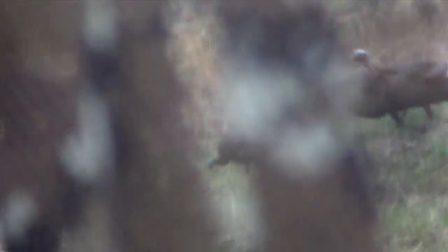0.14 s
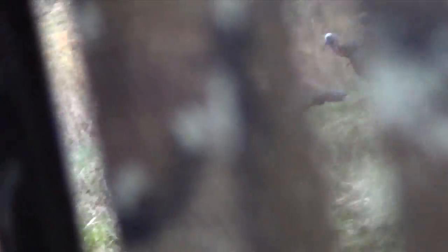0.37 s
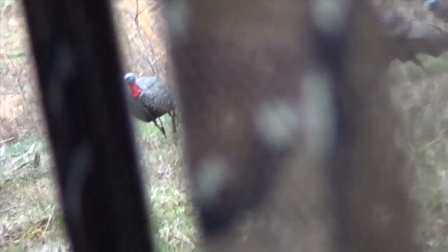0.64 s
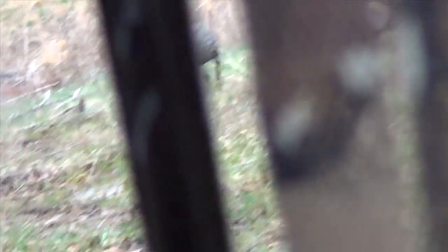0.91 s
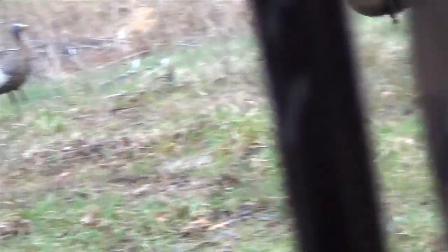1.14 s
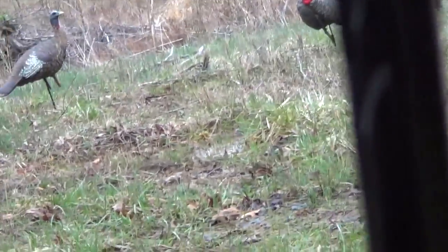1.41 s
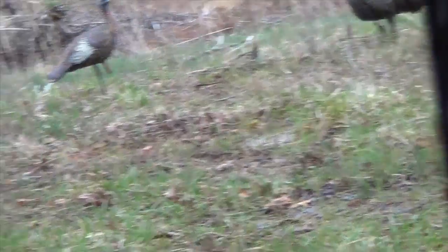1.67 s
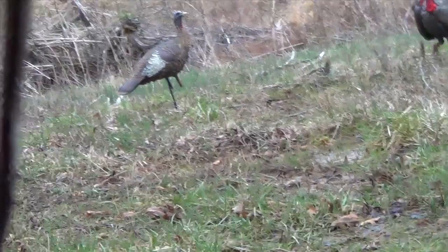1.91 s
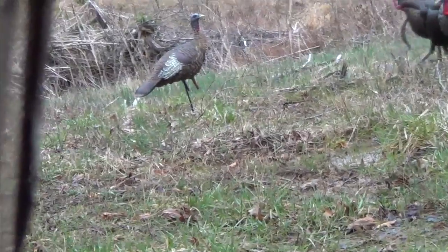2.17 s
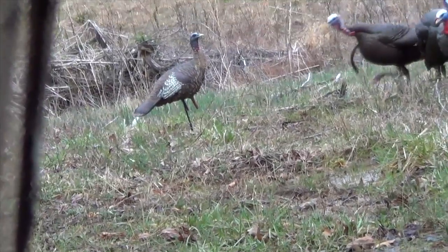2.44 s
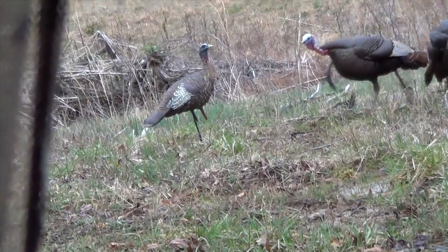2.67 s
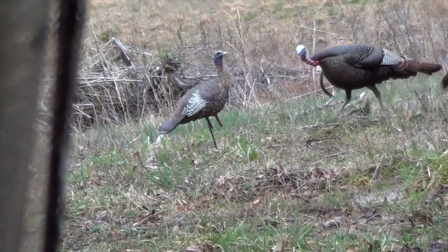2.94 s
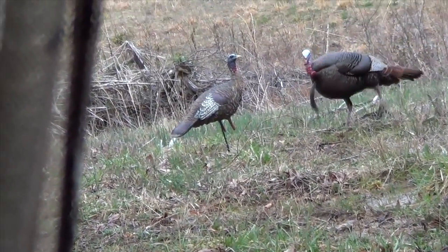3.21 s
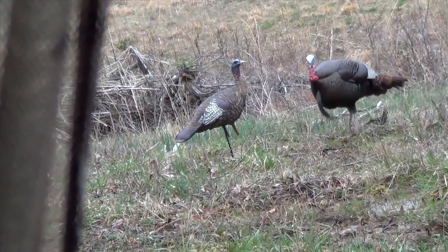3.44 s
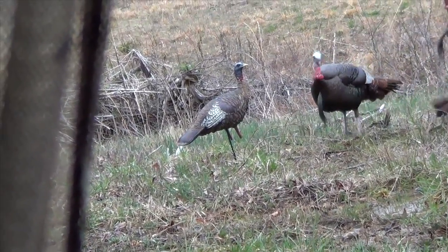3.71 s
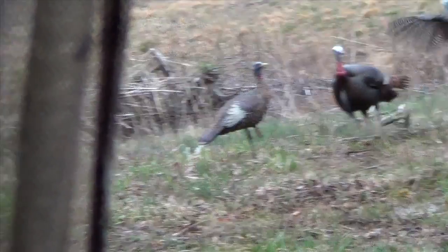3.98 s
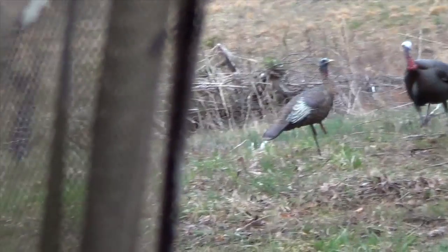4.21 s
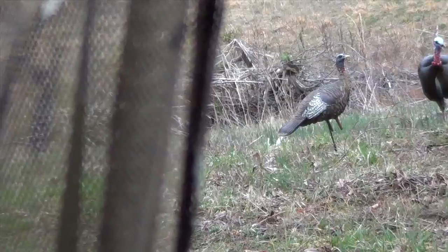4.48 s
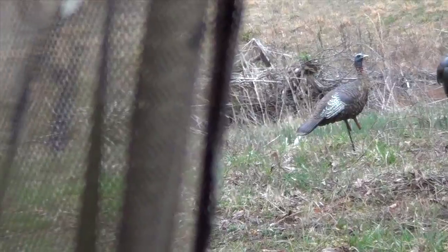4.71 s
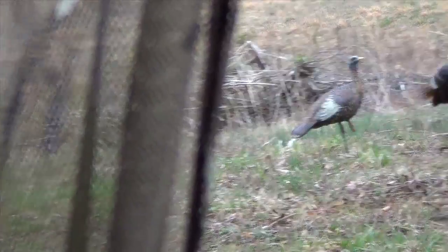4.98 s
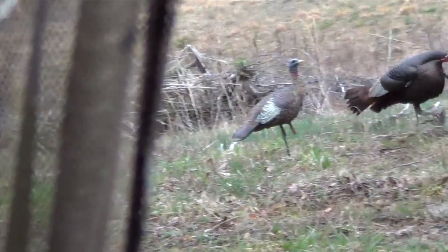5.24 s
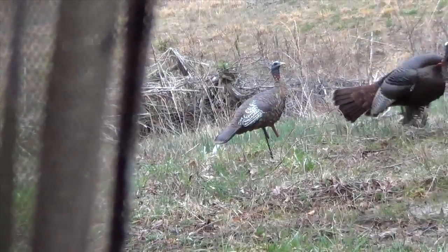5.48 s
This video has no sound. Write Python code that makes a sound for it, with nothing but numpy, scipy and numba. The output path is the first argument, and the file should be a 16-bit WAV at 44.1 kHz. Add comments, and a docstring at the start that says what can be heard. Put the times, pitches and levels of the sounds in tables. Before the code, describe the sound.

Close on the left, a turkey gives three loud, hollow, nearly clean yelps, then short raspy cutts, two more coming late. The handheld camera in a cloth blind picks up taps, rustling fabric and a dense burst of hard knocks after the middle. Faint songbirds whistle in the distance, soft open air lies underneath, and a few tiny creaks come near the end.

```python
"""Turkey yelps and cutts, close and mostly on the left of a handheld camera in a blind at the edge of a field.
Each is a stick-slip pulse train ringing a small hollow body, clean at first and then ever rougher.
Short ragged pushes knock and tick the camera body, shaped noise and snaps make the rustling cloth,
gliding near-sines sing as far birds, lone slips creak, and coloured air and a thin electronic whine lie under all."""
import sys
import numpy as np
from scipy import signal
from scipy.fft import rfft, irfft
from scipy.io import wavfile
from scipy.ndimage import uniform_filter1d
from numba import njit

SR = 44100
rng = np.random.default_rng(int(sys.argv[2]) if len(sys.argv) > 2 else 0)


def volts_from_decibels(level):
    """Turn decibel levels (scalar or array-like) into linear amplitude factors."""
    exponent = np.asarray(level, float) / 20
    return 10 ** exponent


def generate_wav(signal):
    """Clip the signal to [-1, 1] and save it as 16-bit WAV at the path in sys.argv[1]."""
    frames = np.transpose(np.atleast_2d(signal))
    scaled = np.clip(frames, -1, 1) * 32767
    pcm = np.round(scaled).astype(np.int16)
    wavfile.write(sys.argv[1], SR, pcm)


N = 247842
TIME = np.arange(N) / SR

# Low resonances of the camera housing. Each row: centre in Hz, width in Hz, relative level in dB.
THUMP_MODES = [(133, 53, 2), (297, 133, 4.5), (448, 80, 5.5), (604, 150, 0.5), (990, 330, -6),
               (1774, 920, -14)]


def turkey_calls():
    """All calls, placed by pitch, with a brief return from the cloth walls and a later one from the trees."""
    # One list a yelp. Each row: time in s, pressure in dB, slip rate in Hz.
    yelp_strokes = [
        [(.86, -33.5, 722), (.87, -19, 689), (.895, -16.5, 712), (.905, -11.5, 697), (.925, -11.5, 684),
         (.937, -20, 697), (.944, -44.5, 760), (.96, -47.5, 830)],
        [(1.16, -33, 962), (1.168, -20, 912), (1.173, -10, 730), (1.2, -14.5, 710), (1.226, -11.5, 720),
         (1.234, -16, 716), (1.241, -21.5, 808), (1.262, -46.5, 853)],
        [(1.472, -41, 698), (1.482, -33.5, 864), (1.485, -16, 812), (1.5, -12.5, 735), (1.545, -15.5, 743),
         (1.552, -25.5, 764), (1.575, -52.5, 807)],
    ]
    # Colour of each yelp at full pressure and steady slip rate. Each row: favoured pitch in Hz,
    # upper modes in dB, lowest mode in dB, pitch in Hz that the grip damps.
    yelp_colours = [(1487, -17.5, -3.5, 3480), (1482, -13.5, -23, 2170), (1600, -9.5, -19, 2600)]
    # Irregularity of each yelp's slips (0-1), growing as the run goes on.
    yelp_irregular = [.004, .005, .024]
    # Each row: start in s, held length in s, pressure in dB, favoured pitch in Hz at mid-hold,
    # body scale (held tighter or looser).
    cutt_strokes = [(1.93, 0.031, -15, 1450, 0.96), (2.05, 0.051, -15.5, 1615, 1.026),
                    (2.251, 0.038, -15, 1580, 1.024), (2.964, 0.037, -14.5, 1500, .99),
                    (4.568, 0.036, -15, 1310, 0.98), (4.711, 0.053, -14.5, 1580, 1.017)]
    # Each row: pitch in Hz, left minus right in dB.
    call_left = [(200, -21), (700, 5.5), (1300, 8.5), (4400, 8.5), (8000, 4), (15000, 3.5)]
    # Each row: pitch in Hz, radians by which left leads.
    call_lead = [(200, .3), (600, 0.75), (5000, 1.), (6600, 0.12)]
    walls_db, walls_t60_s = -28.0, 0.06
    trees_db, trees_delay_s, trees_t60_s = -31.5, 0.05, 0.3

    direct = sum(yelp(*stroke) for stroke in zip(yelp_strokes, yelp_colours, yelp_irregular))
    direct = direct + sum(cutt(*row) for row in cutt_strokes)

    t = TIME[:SR // 2]
    walls = volts_from_decibels(-60 * t / walls_t60_s) * np.minimum(t / 0.0083, 1)
    trees = volts_from_decibels(-60 * (t - trees_delay_s) / trees_t60_s) * (t > trees_delay_s)
    # unit energy first, so the levels are relative to the direct call
    fade = volts_from_decibels(walls_db) * walls / np.sqrt((walls ** 2).sum())
    fade = fade + volts_from_decibels(trees_db) * trees / np.sqrt((trees ** 2).sum())
    tail = rng.standard_normal((2, len(t))) * fade
    echoes = signal.fftconvolve(direct[None], tail, axes=1)[:, :N]
    return ports(direct, call_left, call_lead) + echoes


def yelp(rows, colour, irregular):
    """A long, clean stroke whose colour follows pressure and slip rate; it catches now and then."""
    # Moments of rougher slipping. Each row: time in s, added irregularity, half length in s.
    catches = [(1.167, .2, .006), (1.209, .035, .004), (1.483, .05, .012), (1.529, .07, .006)]
    # Alternating strong and weak slips: from s, to s, depth (0-1), ramp in s.
    doubling = (1.497, 1.535, .7, .007)
    full_db, steady_hz = -12.5, 703
    favoured_hz, full_upper_db, full_low_db, damped_hz = colour

    s, db, hz = np.transpose(rows)
    t = span(s[0], s[-1])
    db = np.interp(t, s, db, right=-200)
    hz = np.interp(t, s, hz)
    light_db = np.clip(full_db - db, 0, 40)
    fast_hz = hz - steady_hz
    # light pressure and fast slips let the lowest mode speak
    low_db = full_low_db + 0.5974 * light_db + 0.13 * fast_hz
    # light pressure frees the upper modes, fast slips starve them
    upper_db = full_upper_db + 0.31 * light_db - 0.08 * fast_hz

    rough = irregular + sum(more * np.clip(1 - np.abs(t - at) / half, 0, 1) for at, more, half in catches)
    first, last, depth, ramp = doubling
    alternate = depth * np.clip(np.minimum(t - first, last - t) / ramp, 0, 1)
    return call(t, db, hz, favoured_hz, upper_db, low_db, rough, alternate,
                body_scale=0.98, damped_hz=damped_hz, damped_db=-15)


def cutt(start, held, db, favoured_hz, body_scale):
    """A short rough stroke: opens fast, low and full, drops to its slip rate, brightens and climbs as it dies."""
    attack_s, release_s, brighten_s = 0.005, 0.035, 0.013
    slip_hz, start_hz = 690, 860
    climb_oct_per_s = 5.3

    t = span(start, start + held + release_s)
    age = t - start
    shape_db = np.interp(age, [0, attack_s, 0.86 * held, held, held + release_s],
                         [-14.5, 0, 0, -5, -31], right=-200)
    opening = np.clip(1 - age / attack_s, 0, 1)
    hz = slip_hz + (start_hz - slip_hz) * opening
    favoured_hz = favoured_hz * 2 ** (climb_oct_per_s * (age - held / 2))
    upper_db = -12.5 + 15 * (1 - np.exp(-age / brighten_s))
    low_db = -3.5 + 22 * opening
    steady = np.ones(len(t))
    return call(t, db + shape_db, hz, favoured_hz, upper_db, low_db, 0.19 * steady, 0.35 * steady,
                body_scale, damped_hz=2470, damped_db=-6)


def call(t, db, hz, favoured_hz, upper_db, low_db, rough, alternate, body_scale, damped_hz, damped_db):
    """One yelp or cutt: slips pressed by the level curve ring every mode of the body, which then dies away."""
    # The hollow body. Each row: centre in Hz before the body scale, width in Hz,
    # level in dB before the grip leans on it.
    body_modes = [(675, 150, -16.5), (1108, 139, 5), (1264, 240, -3.5), (1409.3, 94, 5), (1793, 114, 6.5),
                  (1976, 18, 0), (2218, 180, -5), (2759, 310, -10), (3464, 366, -13), (4046, 640, -21.5),
                  (5400, 800, -35.5), (9530, 1000, -31.5), (12100, 3500, -39.5)]
    favour_db_per_octave = 18.5

    press = volts_from_decibels(db)
    drive = press * slips(hz, rough, alternate, rng.standard_normal((600, 2)))
    tone = 0
    for k, (mode_hz, width_hz, mode_db) in enumerate(body_modes):
        if mode_hz < 900:
            lean_db = low_db
        elif mode_hz > 2100:
            lean_db = upper_db
        else:  # the grip picks among the middle modes
            lean_db = -favour_db_per_octave * np.abs(np.log2(mode_hz / favoured_hz))
        # each mode is deaf to pitches far from its own
        broad = ring(drive * volts_from_decibels(mode_db + lean_db), mode_hz * body_scale, width_hz + 290.0)
        tone = tone + (-1) ** k * ring(broad, mode_hz * body_scale, width_hz)
    # the grip deadens one band
    tone = tone - (1 - volts_from_decibels(damped_db)) * ring(tone, damped_hz, 500)
    out = np.zeros(N)
    begin = int(round(t[0] * SR))
    out[begin:begin + len(t)] = tone * rms(press) / rms(tone)
    return out


@njit
def slips(hz, rough, alternate, chance):
    """Stick-slip friction: a pulse at each slip, shared by two samples; roughness varies its time and size."""
    out, phase, k = np.zeros(len(hz) + 1), 0.9, 0
    for i in range(len(hz)):
        step = hz[i] / SR * np.exp(rough[i] * chance[k, 0])
        phase += step
        if phase >= 1:
            phase, k = phase - 1, k + 1
            size = (1 - alternate[i] * (k % 2)) * np.exp(rough[i] * chance[k, 1])
            late = phase / step  # the slip falls between two samples
            out[i] += size * late
            out[i + 1] += size * (1 - late)
    return out[:-1]


def span(start, end):
    """Times of a call and of its ring-out."""
    return TIME[int(start * SR):int((end + 0.15) * SR)]


def knocks():
    """Each knock is a short ragged push into the low modes of the housing and a sharp tick into its high ones."""
    # Each row: start in s, tick peak in dB, thump peak in dB, time in s in which the tick's push fades by 60 dB.
    knock_list = [(0.0074, -22.5, -50.5, 0.036), (0.063, -27.5, -34.5, 0.02), (0.2782, -44, -29.5, 0.0074),
                  (0.5283, -48.5, -40.5, 0.0051), (0.543, -30.5, -31.5, 0.005),
                  (1.396, -41.5, -37.5, 0.0065), (1.603, -32.5, -37, 0.009), (1.664, -43, -42, 0.008),
                  (1.739, -53, -37, 0.0089), (1.79, -48, -39.5, 0.0078), (1.8793, -25, -35, 0.048),
                  (2.59, -35, -53, 0.011), (2.736, -44, -40, 0.014), (3.5378, -20.5, -22.5, 0.014),
                  (3.58, -26, -23, 0.018), (3.5903, -19, -26, 0.026), (3.611, -19.5, -23.5, 0.0054),
                  (3.63, -25, -31, 0.006), (3.6498, -13, -20, 0.019), (3.66, -18, -24, 0.028),
                  (3.728, -22, -23, 0.029), (3.743, -38.5, -24, 0.011), (3.788, -33, -29, 0.037),
                  (3.84, -30.5, -36, 0.0053), (3.868, -19, -16.5, 0.0125), (3.8711, -9, -20, 0.029),
                  (3.887, -23.5, -30.5, 0.02), (3.967, -24, -25, 0.0058), (4.013, -37, -31, 0.02),
                  (4.102, -25.5, -41, 0.006), (4.122, -33, -30.5, 0.0085), (4.15, -43, -35.5, 0.005),
                  (4.196, -37, -53.5, 0.006), (4.2225, -41, -28, 0.0033), (4.388, -30.5, -27.5, 0.052),
                  (4.882, -31.5, -31.5, 0.047), (5.5485, -44, -34, 0.0096)]
    # High resonances of the housing. Each row: centre in Hz, width in Hz, relative level in dB.
    tick_modes = [(2150, 3300, 0), (4540, 2500, 3), (6250, 2200, -0.5), (9160, 1100, 1.5),
                  (12500, 4700, -16.5)]
    # Each row: pitch in Hz, left minus right in dB.
    knock_left = [(100, -1.5), (700, 1.5), (1300, 5.5), (4400, 3.5), (8000, 1.5)]
    knock_lead = [(100, 0.47), (1000, 1.0), (6000, 0.1)]  # (Hz, radians by which left leads)
    first_contact = 3.97  # first sample, against a spread of 1 in the ragged push after it
    thump_stretch, light_tap_db = 3.1, -24.5

    out, t = np.zeros(N + 4096), TIME[:4096]
    for s, tick_db, thump_db, length in knock_list:
        push, snap = rng.standard_normal((2, len(t)))
        push[0], snap[0] = first_contact, first_contact
        # a light tap hardly moves the whole housing, so its lowest modes stay quiet
        light_db = min(thump_db - light_tap_db, 0)
        modes = [(hz, w, db + light_db * (hz < 500)) for hz, w, db in THUMP_MODES]
        thump = struck(push * volts_from_decibels(-60 * t / (thump_stretch * length)), modes)
        tick = struck(snap * volts_from_decibels(-60 * t / length), tick_modes)
        begin = int(s * SR)
        out[begin:begin + len(t)] += volts_from_decibels(thump_db) * thump / np.abs(thump).max()
        out[begin:begin + len(t)] += volts_from_decibels(tick_db) * tick / np.abs(tick).max()
    return ports(out[:N], knock_left, knock_lead)


def rustle():
    """Cloth drags in a dull and a bright grainy layer; stiff folds crackle into the housing, oftener in hard moves."""
    # How hard hands move the cloth. Each row: time in s, drag in dB.
    drag_curve = [(0.0, -44.5), (.17, -49.5), (.5, -48.5), (.85, -52), (1.132, -46.5), (1.56, -53),
                  (1.9, -51.5), (2.1, -59), (3.33, -62), (3.521, -54), (3.56, -46), (3.84, -44.5),
                  (4.13, -48), (4.36, -52.5), (4.385, -44), (4.45, -52.5), (4.82, -57), (4.92, -53),
                  (4.98, -56), (5.62, -52.5)]
    # Colours of the dull and the bright layer. Each row: pitch in Hz, relative density in dB per Hz.
    dull_colour = [(29, -53), (50, -23.5), (156, -5.5), (278, -7.5), (350, -3), (757, 0.5), (2750, -7),
                   (5000, -21), (6500, -51), (11000, -120)]
    bright_colour = [(1470, -17), (2500, -5.5), (2740, -15.5), (3660, -1), (4580, -2.5), (9220, 0.5),
                     (14800, -10.5), (15200, -10.5), (16000, -15)]
    crackles_per_s, usual_drag_db = 120, -48.5  # the rate holds at the usual drag

    drag = volts_from_decibels(np.interp(TIME, *np.transpose(drag_curve)))
    happens = rng.random(N) < crackles_per_s / SR * drag / volts_from_decibels(usual_drag_db)
    snaps = happens * volts_from_decibels(17 + 4.1 * rng.random(N)) * rng.choice([-1, 1], size=N)
    crackle = struck(drag * snaps, THUMP_MODES)
    dull = noise(dull_colour, grain_db=2.4)
    bright = volts_from_decibels(-0.5) * noise(bright_colour, grain_db=1.5)
    return drag * (dull + bright) + crackle


def creaks():
    """A small part of the camera creaks: lone slips ringing one high mode."""
    # Each row: time in s, approximate peak in dB.
    creak_slips = [(5.093, -50), (5.1319, -47.5), (5.1843, -42), (5.1996, -40), (5.21, -39), (5.2245, -43),
                   (5.249, -41.5), (5.2964, -39.5), (5.3225, -41), (5.3279, -37)]
    creak_hz, width_hz = 4820, 210
    hits = np.zeros(N)
    for s, db in creak_slips:
        hits[int(s * SR)] = volts_from_decibels(db)
    return ring(hits, creak_hz, width_hz) * SR / (2 * np.pi * width_hz)  # peak near the hit's level


def birds():
    """Near-sine notes whose pitch relaxes to its end value; distance makes them flutter."""
    # A far songbird. Each row: start in s, length in s, level in dB before the flutter.
    song_notes = [(1.742, .03, -61), (2.03, .03, -59), (2.18, .08, -59), (2.335, .075, -62),
                  (2.458, .085, -60), (2.59, .08, -60), (2.708, .045, -62), (2.784, .032, -61),
                  (2.846, .034, -62), (2.915, .024, -61), (3.088, .025, -65), (3.15, .025, -64),
                  (3.2, .025, -66), (3.305, .025, -65), (3.36, .025, -63)]
    # Other far notes. Each row: start in s, length in s, start pitch in Hz, pitch in Hz it relaxes to,
    # level in dB before the flutter.
    other_notes = [(1.82, .11, 3700, 3900, -61), (3.23, .07, 3300, 3470, -65),
                   (4.995, .05, 2550, 1750, -60), (5.182, .03, 1740, 1710, -58),
                   (5.214, .03, 2060, 1640, -60), (5.3, .115, 1830, 1833, -56),
                   (5.54, .08, 1834, 1824, -57), (5.563, .036, 2450, 1900, -58)]
    top_hz, long_hz, short_hz, short_s = 4100, 3350, 3050, 0.04
    song_fall_s, other_fall_s = 0.013, 0.022

    notes = []
    for s, length, db in song_notes:
        # every song note drops from the same top, short ones towards a lower pitch
        end_hz = short_hz if length < short_s else long_hz
        notes.append((s, length, top_hz, end_hz, db, song_fall_s))
    notes += [note + (other_fall_s,) for note in other_notes]

    out = np.zeros(N + SR)
    for s, length, start_hz, end_hz, db, fall_s in notes:
        t = np.arange(int(length * SR)) / SR
        hz = end_hz + (start_hz - end_hz) * np.exp(-t / fall_s)
        fades = np.clip(np.minimum(t, length - t) / 0.0027, 0, 1)
        begin = int(s * SR)
        out[begin:begin + len(t)] += volts_from_decibels(db) * fades * np.sin(2 * np.pi * np.cumsum(hz) / SR)
    flutter = volts_from_decibels(4.3 * walk(60) - 2.0)
    return out[:N] * flutter


def air():
    """The open air: steady coloured noise with a grainy level."""
    # Each row: pitch in Hz, relative density in dB per Hz.
    air_colour = [(18, -57), (45, -9.5), (75, -1), (295, 1.5), (822, 1), (1250, -12), (3400, -13.5),
                  (5170, -28), (9710, -19.5), (14800, -12.5), (16000, -16)]
    return volts_from_decibels(-62.5) * noise(air_colour, grain_db=-2.0)


def whine():
    """The camera's electronics whine: a steady sine at its line rate."""
    # Each row: pitch in Hz, level in dB rms.
    whine_tones = [(15735, -64.5)]
    return sum(np.sqrt(2) * volts_from_decibels(db) * np.sin(2 * np.pi * hz * TIME) for hz, db in whine_tones)


def rms(x):
    """Root mean square, kept above zero."""
    return np.sqrt(np.mean(x ** 2)) + 1e-12


def ring(x, hz, width_hz):
    """Two-pole resonance, gain near 1 at the centre."""
    r = np.exp(-np.pi * width_hz / SR)
    return signal.lfilter([1 - r, 0, r - 1], [1, -2 * r * np.cos(2 * np.pi * hz / SR), r * r], x)


def struck(x, modes):
    """Sum of a table of modes, alternate in sign."""
    return sum((-1) ** k * volts_from_decibels(db) * ring(x, hz, w) for k, (hz, w, db) in enumerate(modes))


def on_log(points, hz):
    """Read a curve of (Hz, value) points on a log pitch axis."""
    p = np.array(points, float)
    return np.interp(np.log(np.maximum(hz, 1)), np.log(p[:, 0]), p[:, 1])


def walk(rate):
    """Random levels held 1 / rate s and slewed; spread near 1."""
    k = int(SR / rate)
    return uniform_filter1d(np.repeat(rng.standard_normal(N // k + 1), k), k)[:N]


def noise(colour, grain_db):
    """Grainy stereo noise in the given colour, its mid at rms 1, narrow in the bass and top."""
    # Each row: pitch in Hz, side minus mid in dB.
    side_db = [(60, -21), (200, -10.5), (700, -3.5), (2400, -4), (4400, -5), (8100, -10), (15000, -47.5)]
    hz = np.fft.rfftfreq(N, 1 / SR)
    grain = volts_from_decibels(grain_db * (walk(230) + walk(25)))
    mid, side = rfft(rng.standard_normal((2, N)) * grain) * volts_from_decibels(on_log(colour, hz))
    mid = irfft(mid, N)
    side = irfft(side * volts_from_decibels(on_log(side_db, hz)), N)
    return np.array([mid + side, mid - side]) / rms(mid)


def ports(x, left, lead):
    """Place a mono sound on the two ports by a level and a phase difference that depend on pitch."""
    hz = np.fft.rfftfreq(N, 1 / SR)
    half = volts_from_decibels(on_log(left, hz) / 2) * np.exp(0.5j * on_log(lead, hz))
    even = 2 / np.abs(half + 1 / half)  # keeps the level of the two ports' average
    return irfft(rfft(x) * np.array([half, 1 / half]) * even, N)


def scene():
    """Everything at the two microphone ports."""
    return turkey_calls() + knocks() + rustle() + creaks() + birds() + air() + whine()


def top_cut(x):
    """Nothing passes above the cut-off."""
    return signal.sosfilt(signal.butter(12, 16690, fs=SR, output="sos"), x)


def record(dry):
    """The preamp rounds the loudest peaks, a little lopsidedly, so loud calls thud in the deep bass."""
    rounded = np.tanh(1.031 * dry) / 1.009
    lopsided = 0.01 * dry ** 2
    return top_cut(rounded + lopsided)


dry = scene()
out = record(dry)
generate_wav(out)
```